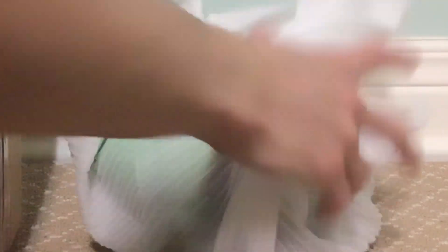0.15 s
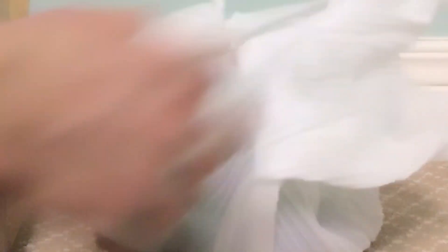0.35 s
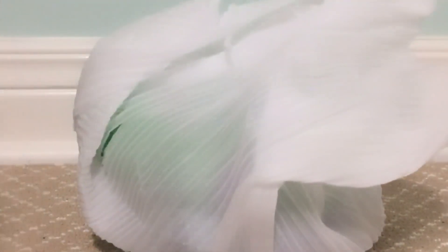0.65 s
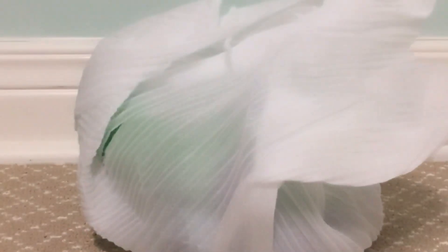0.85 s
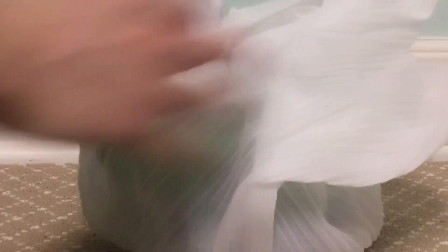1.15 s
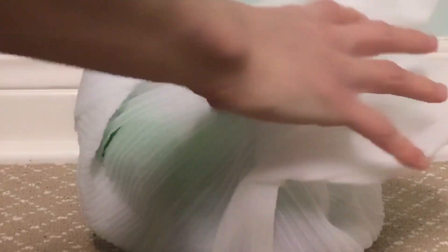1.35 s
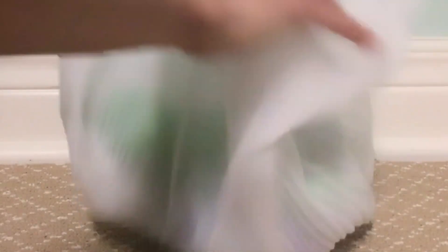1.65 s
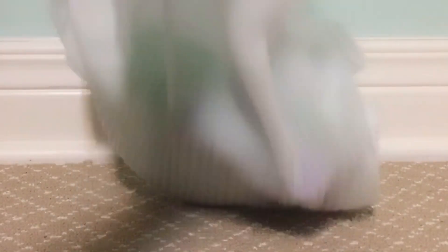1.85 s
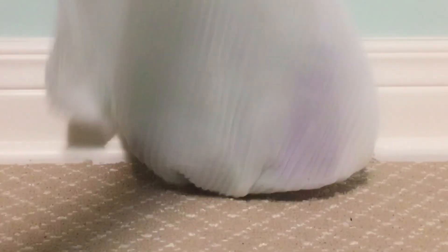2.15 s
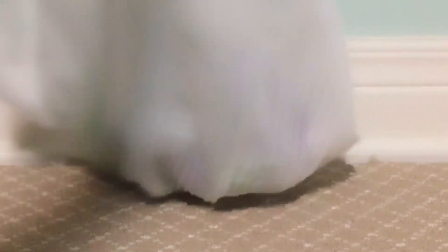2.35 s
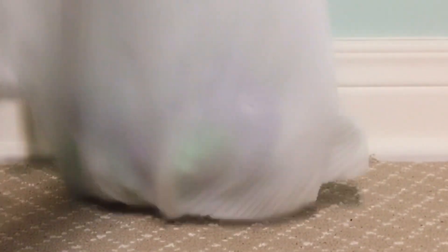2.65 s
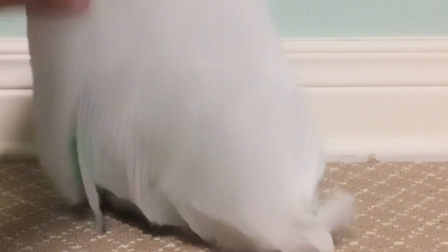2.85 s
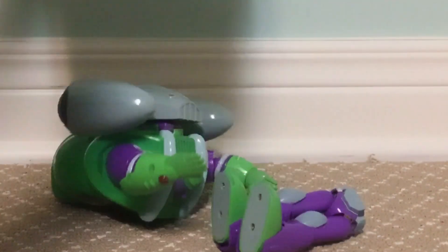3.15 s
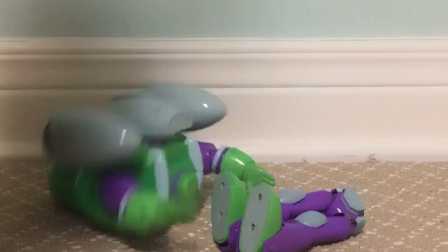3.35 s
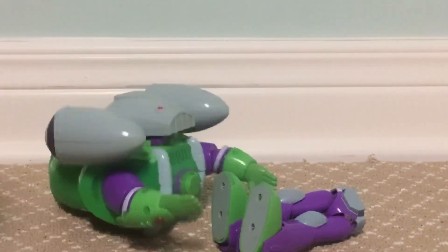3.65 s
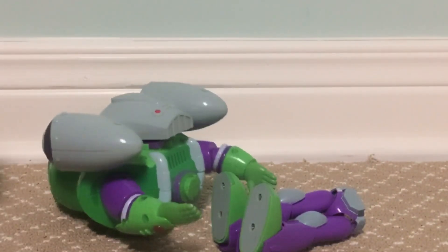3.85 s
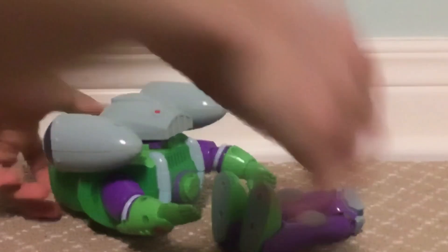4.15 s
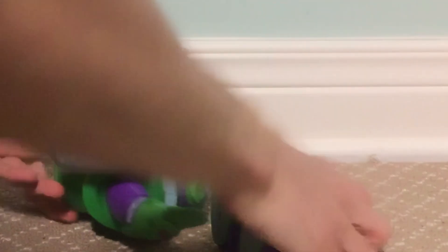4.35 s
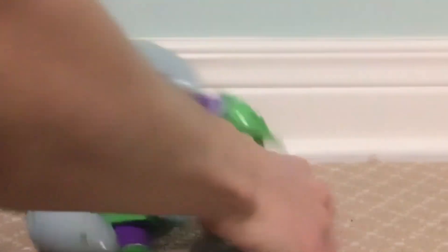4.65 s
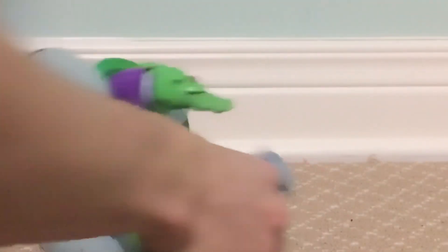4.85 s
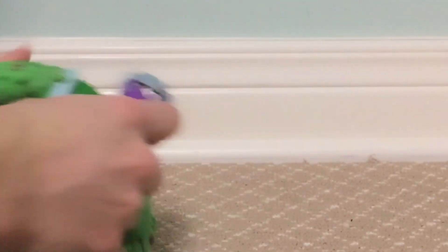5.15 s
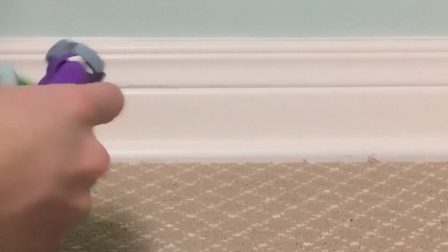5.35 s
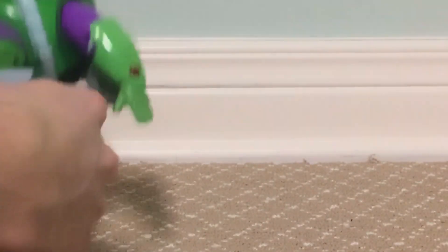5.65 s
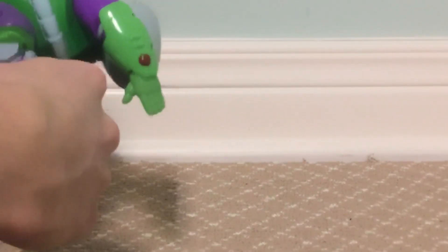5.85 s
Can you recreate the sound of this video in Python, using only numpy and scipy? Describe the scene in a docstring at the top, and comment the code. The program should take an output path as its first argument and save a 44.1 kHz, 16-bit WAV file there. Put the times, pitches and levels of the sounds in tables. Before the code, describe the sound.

Hands unwrap a plastic toy: first a sharp crinkle and bump, soft rustling with a strong dull box knock, a short pause, then busy sizzling crumple and popping creases. A final swish is followed by near silence. The toy's hard parts clack together in a quick cluster, with faint ticks afterwards. Dry small-room sound, close microphone, faint air noise behind.

```python
"""Hands pull a crinkly wrapping sheet off a plastic toy and stuff it in a cardboard box, heard from close by.
The sheet is crackling noise in two bands, a rustle and a higher sizzle, plus tiny buckles and popping creases.
Then the toy is picked up: short bursts of noise ring in its hollow shell as its parts clack and rattle.
The box booms as noise when the sheet drags on it, and as damped swings when it is bumped.
A short room echo follows the hits; behind it all lie steady air noise and a few faint, blurred tones."""
import sys
import numpy as np
from scipy import signal
from scipy.fft import rfft, irfft, next_fast_len
from scipy.io import wavfile
from scipy.ndimage import uniform_filter1d, map_coordinates

SR = 44100
rng = np.random.default_rng(int(sys.argv[2]) if len(sys.argv) > 2 else 0)


def generate_wav(signal):
    """Clip the signal to [-1, 1] and save it as 16-bit WAV at the path in sys.argv[1]."""
    frames = np.transpose(np.atleast_2d(signal))
    scaled = np.clip(frames, -1, 1) * 32767
    pcm = np.round(scaled).astype(np.int16)
    wavfile.write(sys.argv[1], SR, pcm)


N = 264600  # samples: 6 s


def amp(db):
    """Turn decibels into a plain multiplier."""
    return 10 ** (np.asarray(db) / 20)


def unit(x):
    """Scale x to an rms of 1."""
    return x / np.sqrt(np.mean(x ** 2) + 1e-20)


def along(points, hz):
    """Read a curve of (frequency, value) points on a log frequency axis."""
    f, value = np.transpose(points)
    return np.interp(np.log(hz + 1), np.log(f + 1), value)


def wobble(rate):
    """A smooth random curve through `rate` random points a second."""
    points = rng.standard_normal(int(N * rate / SR) + 4)
    return map_coordinates(points, [np.arange(N) * rate / SR])


def filtered(x, response):
    """Multiply the spectrum of x by a response given as a function of frequency."""
    size = next_fast_len(len(x) + 8192)
    hz = np.fft.rfftfreq(size, 1 / SR)
    return irfft(rfft(x, size) * response(hz), size)[:len(x)]


def coloured(x, spectrum):
    """Shape x by a spectrum table, then scale it to an rms of 1."""
    return unit(filtered(x, lambda hz: amp(along(spectrum, hz))))


def mode(hz, centre_hz, width_hz):
    """The response of one resonance, which rings only after it is struck."""
    return 1j * hz * width_hz / (centre_hz ** 2 - hz ** 2 + 1j * hz * width_hz)


def crackle(rate, spread_db, life, patchy_db, drift_db):
    """Noise lit up by `rate` uneven bursts a second, each dying in `life` s, its colour always shifting."""
    kicks = (rng.random(N) < rate / SR) * amp(spread_db * rng.exponential(size=N))
    glow = signal.lfilter([1], [1, -np.exp(-1 / (life * SR))], kicks)
    z = signal.stft((1 + glow) * rng.standard_normal(N), nperseg=256)[2]
    # Random gains over frequency and time: one set changes quickly, the other slowly
    field = uniform_filter1d(rng.standard_normal((2, *z.shape)), size=4, axis=1)
    quick = uniform_filter1d(field[0], size=4)
    slow = uniform_filter1d(field[1], size=16)
    colour = amp(patchy_db * unit(quick) + drift_db * unit(slow))
    return signal.istft(z * colour, nperseg=256)[1][:N]


def ticks(count, centre_hz, octaves, cycles, spread_db):
    """Tiny buckles at random moments, each a damped swing at its own pitch."""
    when, size = rng.random((2, count))
    hz = np.clip(centre_hz * 2 ** (octaves * rng.standard_normal(count)), 300, 14000)[:, None]
    k = np.arange(256)
    decay = np.exp(-hz * k / SR / cycles)
    swing = np.sin(2 * np.pi * hz * k / SR) * decay * amp(spread_db * size ** 3)[:, None]
    places = (when * N).astype(int)[:, None] + k
    return unit(np.bincount(places.ravel(), swing.ravel(), minlength=N)[:N])


# How hard the hands work the sheet, then the toy: (time [s], rustle level [dB], sizzle above the rustle [dB])
HAND_WORK = [(0.0, -46, -8), (0.135, -42.5, -3.5), (0.15, -51.5, -12.5), (0.21, -59.5, -10),
             (0.294, -58, -7), (0.376, -67.5, -10.5), (0.54, -64, -9.5), (0.598, -52, -18.5),
             (0.736, -54, -18), (0.926, -47.5, -12), (1.082, -56, -18), (1.36, -71, -10.5),
             (1.542, -56, -5), (1.66, -53.5, -8), (1.73, -43, -8), (1.898, -63.5, -8), (1.958, -55, 3),
             (2.25, -50, -4.5), (2.446, -44, -4), (2.76, -44, -9), (3.016, -51, -11.5), (3.258, -52, -8),
             (3.475, -38, -10), (3.505, -46.5, -6), (3.55, -51, -8.5), (3.6, -59.5, -7), (3.83, -55, -14),
             (3.86, -65, -8.5), (4.134, -73, -11), (4.44, -69.5, -11), (4.49, -62.5, -9), (4.99, -54, -20),
             (5.2, -72.5, -2), (5.81, -79, -5), (5.84, -64, -17), (5.89, -73, -16), (5.96, -54.5, -17),
             (6.0, -75, -9)]
# Quick tugs at the sheet or the toy: (time [s], lift of the sizzle [dB], length [s])
QUICK_TUGS = [(0.589, 12, 0.026), (0.673, 7.5, 0.02), (0.776, 11.5, 0.019), (0.959, 5, 0.028),
              (1.558, 7.5, 0.018), (1.792, 8, 0.012), (1.953, 7.5, 0.025), (2.13, 15, 0.0196),
              (2.281, 4, 0.0109), (2.33, 4, 0.025), (2.393, 14.5, 0.0077), (2.43, 8, 0.025),
              (2.469, 9.5, 0.011), (2.62, 8.5, 0.01), (2.666, 9, 0.047), (2.771, 14, 0.0086),
              (2.804, 15, 0.017), (3.038, 4, 0.013), (3.157, 6.5, 0.0078), (3.343, 3, 0.017),
              (3.41, 0, 0.023), (3.737, 7, 0.039), (4.788, 18.5, 0.015), (5.646, 4, 0.0214)]
# Drag on the box walls: (time [s], level [dB])
BOX_DRAG = [(0.0, -71), (0.04, -38.5), (0.2, -76), (0.45, -58.5), (0.53, -57), (0.58, -51.5), (1.05, -48.5),
            (1.35, -66.5), (1.65, -62.5), (2.15, -60), (2.82, -51), (3.07, -61), (4.05, -62.5),
            (4.33, -76.5), (6.0, -75)]
# Colour of the rustle, also used by the creases and the toy: (frequency [Hz], level per Hz [dB])
RUSTLE_COLOUR = [(210, -24), (350, 2.5), (467, -5.5), (680, 3.5), (907, -4.5), (1080, 2.5), (1370, -2.5),
                 (1500, 0), (1970, 1), (2500, -3.5), (3740, 2), (5950, -13), (7000, -15), (9100, -23.5),
                 (15400, -120)]
# Colour of the sizzle, also used by every knock: (frequency [Hz], level per Hz [dB])
SIZZLE_COLOUR = [(2500, -82.5), (4500, -2.5), (6300, -7.5), (8500, -2), (9640, -9.5), (10400, -1),
                 (11600, 0.5), (13200, -3.5), (14000, -23.5), (15800, -12.5)]
# Colour of the boom from the dragged box walls: (frequency [Hz], level per Hz [dB])
BOX_COLOUR = [(29, -67.5), (50, -85.5), (109, -17.5), (257, -5), (318, -16), (360, -18), (433, -20.5),
              (500, -17.5), (650, -27), (1100, -120)]
RUSTLE_SHARE = 0.62  # the rustle rises by this share of a tug's lift in dB


def handling():
    """The sheet slides and crumples in jerks; its drag makes the box walls boom."""
    t = np.arange(N) / SR
    times, rustle_points, sizzle_points = np.transpose(HAND_WORK)
    rustle_db = np.interp(t, times, rustle_points)
    sizzle_db = np.interp(t, times, sizzle_points)
    for start, lift_db, length in QUICK_TUGS:
        swell = lift_db * np.exp(-((t - start) / length) ** 2)
        rustle_db = rustle_db + RUSTLE_SHARE * swell
        # The sizzle rides on the rustle, so it only needs the rest of the lift
        sizzle_db = sizzle_db + (1 - RUSTLE_SHARE) * swell

    jerk = wobble(45)  # shared, so the layers swell together
    rustle = crackle(rate=150, spread_db=3, life=0.00035, patchy_db=1.5, drift_db=3.5)
    rustle = coloured(amp(1.2 * jerk) * rustle, RUSTLE_COLOUR)
    sizzle = crackle(rate=250, spread_db=3, life=0.00054, patchy_db=1.5, drift_db=1.5)
    sizzle = coloured(amp(1.4 * jerk + 0.37 * wobble(57)) * sizzle, SIZZLE_COLOUR)
    buckles = ticks(count=2000, centre_hz=2447, octaves=0.72, cycles=12, spread_db=6)
    sheet = rustle + amp(-12 + 1.9 * jerk) * buckles + amp(sizzle_db) * sizzle

    boom = coloured(amp(3.5 * wobble(30)) * rng.standard_normal(N), BOX_COLOUR)
    drag_db = np.interp(t, *np.transpose(BOX_DRAG))
    return amp(rustle_db) * sheet + amp(drag_db) * boom


RING_FADES = 0.39  # dB of ring lost for each dB of blow: a light touch rings cleaner
DULL_RINGS = 0.4  # dB of ring gained for each dB of sizzle lost: a blunt contact rings rounder
LASTS_SPREAD = 0.14  # contacts last unevenly [octaves]


def knocks(rows, body, rise, ring_db, t60):
    """Each contact is a dying burst of force into the body, the struck part ringing at its own pitch."""
    lead = SR // 200  # room for the part of the filtered burst that comes before the contact
    out = np.zeros(N + SR)
    t = np.maximum(np.arange(SR // 8) - lead, 0) / SR
    for start, db, sizzle_db, pitch in rows:
        lasts = t60 * 2 ** (LASTS_SPREAD * rng.standard_normal())  # s to fall by 60 dB
        envelope = (1 - np.exp(-t / rise)) * amp(-60 * t / lasts)
        force = rng.standard_normal((2, len(t))) * envelope
        ring = amp(ring_db - RING_FADES * db - DULL_RINGS * sizzle_db)
        low = unit(filtered(force[0], lambda hz: body(hz) * (1 + ring * mode(hz, pitch, pitch / 6))))
        burst = low + amp(sizzle_db) * coloured(force[1], SIZZLE_COLOUR)
        out[round(start * SR):][:len(t)] += amp(db) * burst / abs(burst).max()
    return out[lead:N + lead]


# Creases of the sheet snapping over: (time [s], peak level [dB], sizzle level [dB], pitch [Hz])
CREASE_SNAPS = [(0.044, -12.5, -13, 660), (0.066, -28, -8.5, 1100), (0.097, -22, -25, 1050),
                (0.11, -20, -31, 1240), (0.917, -30, -14, 3360), (1.73, -33, 2, 4230),
                (1.972, -25.5, 2.5, 3550), (1.988, -26.5, -2, 3730), (2.09, -30, 11, 3630),
                (2.134, -36, 11, 3020), (2.177, -24.5, -7, 1480), (2.186, -29, -14.5, 3030),
                (2.373, -21, -30, 675), (2.463, -32, -8.5, 3830), (2.548, -22.5, -16, 1430),
                (2.673, -23.5, 5, 3400), (2.688, -22.5, -4, 2030), (2.784, -28, -26, 1130),
                (2.804, -20.5, -5.5, 2780), (2.829, -25.5, -17.5, 1200), (2.842, -29, -23, 1050),
                (2.865, -29, -16, 1100), (2.902, -30, -19, 1160), (2.962, -27, -11.5, 1740),
                (3.474, -27.5, -13, 1480), (3.49, -33.5, -16, 590), (3.514, -31.5, -22, 790),
                (3.536, -32, -17, 630), (3.656, -46, -24.5, 1580), (3.821, -44.5, -9, 2620)]
# A knuckle on the box: (time [s], peak level [dB], sizzle level [dB], pitch [Hz])
KNUCKLE_TAP = [(0.341, -34.5, -34, 1010)]


def snaps():
    """Creases pop with the sheet's own colour; the knuckle tap is nearly all ring."""
    sheet = lambda hz: amp(along(RUSTLE_COLOUR, hz))
    creases = knocks(CREASE_SNAPS, sheet, rise=0.0028, ring_db=-7.5, t60=0.029)
    tap = knocks(KNUCKLE_TAP, sheet, rise=0.004, ring_db=14, t60=0.035)
    return creases + tap


RATTLE_SPAN = (4.5, 5.18)  # loose parts chatter while the toy is lifted [s]
RATTLE_DB, RATTLE_SIZZLE_DB, RATTLE_HZ = -53, -28.5, 2270  # middle peak level, sizzle level, middle pitch


def rattle(count):
    """List faint chance contacts, uneven in strength and pitch, as rows for knocks()."""
    when = rng.uniform(*RATTLE_SPAN, count)
    luck = rng.standard_normal((count, 2))
    return [(start, RATTLE_DB + 4 * strength, RATTLE_SIZZLE_DB, RATTLE_HZ * 2 ** (0.77 * pitch))
            for start, (strength, pitch) in zip(when, luck)]


# The toy's parts knocking together: (time [s], peak level [dB], sizzle level [dB], pitch [Hz])
TOY_CLACKS = [(4.49, -22.5, -36, 1270), (4.529, -37, -33, 2090), (4.553, -42, -37, 780),
              (4.61, -37.5, -26, 1070), (4.659, -37.5, -20, 3400), (4.77, -18.5, -1, 3640),
              (4.809, -33, -10, 1610), (4.837, -39, -12, 1640), (4.883, -27, -23, 1440),
              (4.906, -23.5, -21, 1900), (4.919, -29, -18, 3240), (4.934, -32.5, -30, 3770),
              (4.994, -30.5, -25, 4100), (5.002, -38.5, -37, 3400), (5.061, -27, -21, 4300),
              (5.096, -42, -19, 3900), (5.142, -45, -22, 3800), (5.154, -50, -25, 2060),
              (5.193, -46, -29, 1900), (5.322, -53.5, -12, 3600), (5.337, -51.5, -7, 3220),
              (5.353, -52, -23, 3370), (5.416, -44.5, -9, 3100), (5.453, -49.5, -21, 1170),
              (5.529, -54.5, -13, 3480), (5.58, -49, -8, 2165), (5.641, -50.5, 2, 4030),
              (5.65, -44.5, 4, 4270), (5.667, -53, 3.5, 3470), (5.823, -29.5, -36, 3210),
              (5.836, -43.5, -6, 3350), (5.94, -48, -3, 2480), (5.948, -39, -12.5, 3030),
              (5.963, -34.5, -28, 1910)]
# Resonances of the hollow plastic shell: (frequency [Hz], width [Hz], level [dB])
SHELL_MODES = [(691, 98, 2), (1590, 90, 4.5), (1980, 110, -13.5), (2628, 77, 3), (3580, 81, -17),
               (4750, 160, -2)]


def toy():
    """Hard plastic clacks, ringing in the shell's modes; so small a shell gives little bass."""
    def shell(hz):
        """The small shell's response: a broad colour plus its modes, with the bass rolled off."""
        small = (1j * hz / (500 + 1j * hz)) ** 2
        # Neighbouring modes push in opposite directions
        modes = sum((-1) ** k * amp(db) * mode(hz, centre, width)
                    for k, (centre, width, db) in enumerate(SHELL_MODES))
        return small * (0.77 * amp(along(RUSTLE_COLOUR, hz)) + modes)

    return knocks(TOY_CLACKS + rattle(count=24), shell, rise=0.0005, ring_db=-15, t60=0.029)


# Bumps against the box: (time [s], level [dB], pitch [Hz])
BOX_BUMPS = [(0.043, -31, 256), (0.172, -43, 250), (0.548, -40, 284), (0.603, -25.5, 265),
             (0.638, -35, 282), (0.84, -37.5, 270), (0.871, -20, 261), (0.916, -35, 288),
             (1.019, -44.5, 150), (1.049, -39.5, 197), (1.148, -38.5, 284), (1.243, -43, 270),
             (1.292, -48.5, 242), (1.529, -48.5, 238), (2.171, -42, 240), (2.374, -41, 324),
             (2.689, -42, 256), (2.78, -43.5, 266), (3.473, -36, 233), (3.486, -40.5, 132),
             (3.511, -42, 114), (3.666, -47, 255), (3.95, -55, 225), (4.004, -49.5, 231), (4.055, -60, 239)]
DAMP_S = 0.013  # the damping has taken about 6 dB off a bump by then [s]
PUSH = 0.23  # share of the slow shove under each bump


def bumps():
    """A soft push sets a cardboard wall swinging; the hand damps it after a few cycles."""
    out = np.zeros(N + SR)
    t = np.arange(SR // 8) / SR
    for start, db, hz in BOX_BUMPS:
        phase = 2 * np.pi * hz * t
        shove = PUSH * np.sin(0.57 * phase)
        overtone = 0.53 * amp(-60 * t / 0.03) * np.sin(2.55 * phase)
        swing = np.sin(phase) + shove + overtone
        rise = 1 - np.exp(-t / 0.0021)
        out[round(start * SR):][:len(t)] += amp(db - 6.3 * (t / DAMP_S) ** 2) * rise * swing
    return out[:N]


# How long the room's echo takes to fall by 60 dB: (frequency [Hz], time [s])
ROOM_FADE = [(200, 0.13), (2000, .2), (10000, 0.014)]


def room(x):
    """Each frequency of the walls' answer dies at its own speed."""
    hz, t, z = signal.stft(rng.standard_normal(SR // 2), SR, nperseg=256)
    fade = amp(-60 * t / along(ROOM_FADE, hz)[:, None])
    tail = signal.istft(z * fade, SR, nperseg=256)[1]
    late = np.pad(x, (300, 0))  # the answer comes about 7 ms late
    return signal.fftconvolve(late, tail / np.linalg.norm(tail))[:N]


# Colour of the room air: (frequency [Hz], level per Hz [dB])
AIR_COLOUR = [(24, -39.5), (40, -13.5), (353, 8.5), (513, -3.5), (1790, -18.5), (1980, -18), (2300, -13),
              (7840, -25), (12900, -16), (15800, -58)]
# Tones of a distant appliance: (frequency [Hz], level the tone wavers around [dB])
HUM_TONES = [(221, -78), (1319, -83.5), (1561, -84.5), (2040, -82)]
AIR_DB = -81  # rms level of the air noise


def quiet():
    """Room air as steady noise, and a few faint tones blurred in level and phase."""
    t = np.arange(N) / SR
    tones = np.zeros(N)
    for hz, db in HUM_TONES:
        level = amp(db + 4 * wobble(18))
        tones += level * np.sin(2 * np.pi * hz * t + 1.5 * wobble(25))
    return amp(AIR_DB) * coloured(rng.standard_normal(N), AIR_COLOUR) + tones


ROOM_DB = -14  # level of the room's answer to the hits


def scene():
    """Mix the handling, the hits with their room echo, and the quiet background."""
    hits = snaps() + toy() + bumps()
    return (handling() + hits + amp(ROOM_DB) * room(hits) + quiet())[None]


BASS_HZ, TOP_HZ = 103, 15800  # the microphone port loses the bass below one; nothing passes above the other


def record(dry):
    """The microphone loses the deep bass and keeps nothing above its band limit."""
    port = lambda hz: (1j * hz / (BASS_HZ + 1j * hz)) ** 2
    return filtered(dry[0], lambda hz: port(hz) * (hz < TOP_HZ))[None]


dry = scene()
out = record(dry)
generate_wav(out)
```